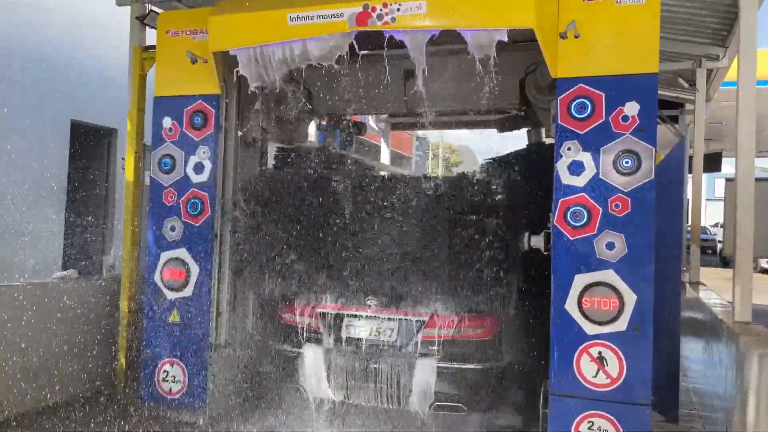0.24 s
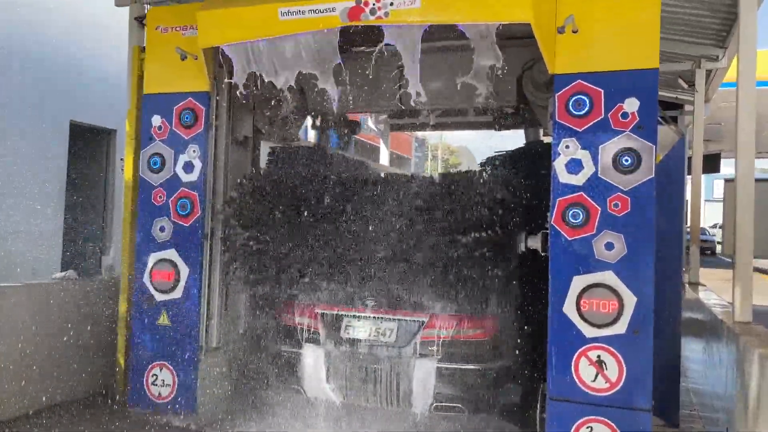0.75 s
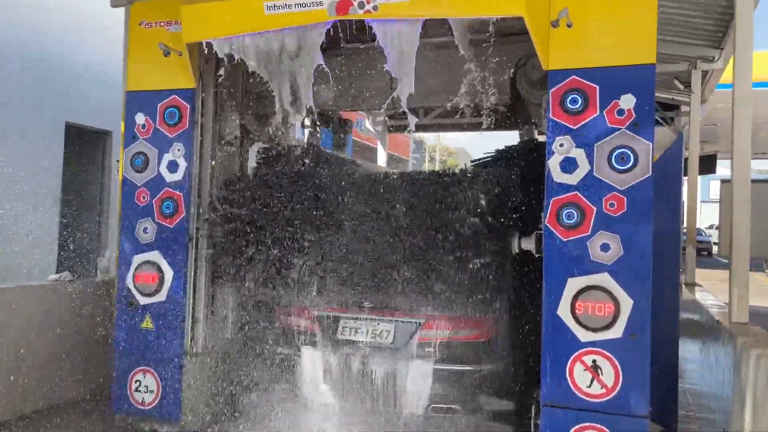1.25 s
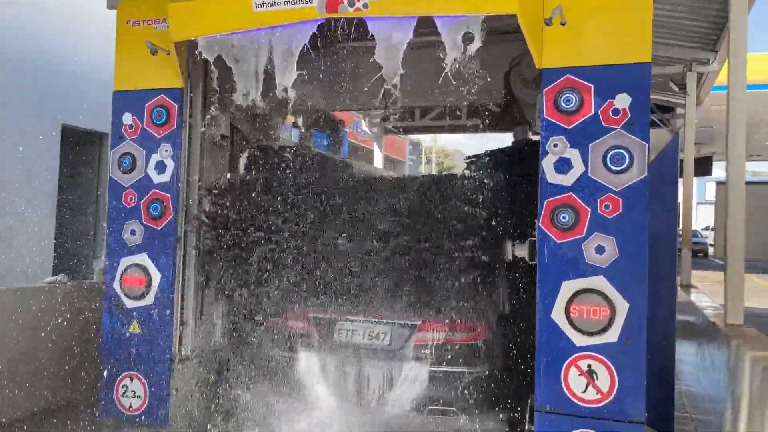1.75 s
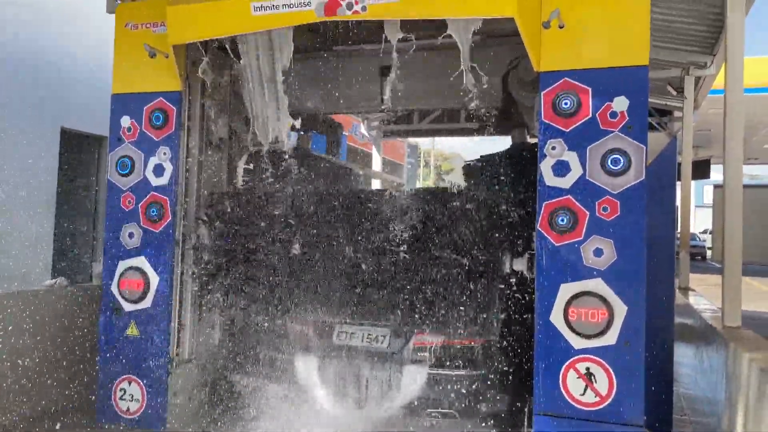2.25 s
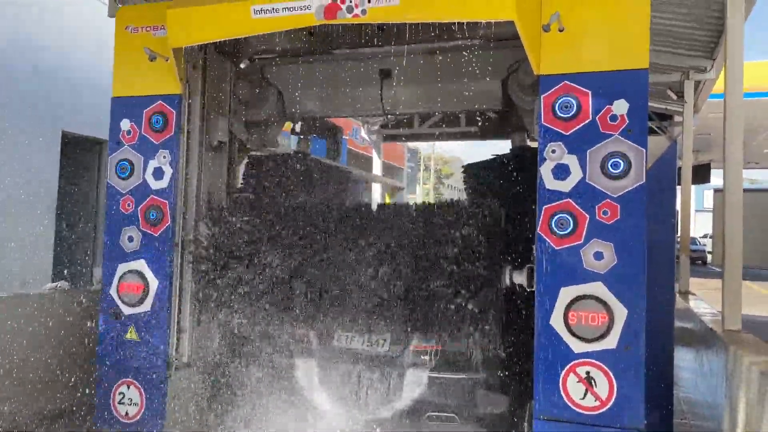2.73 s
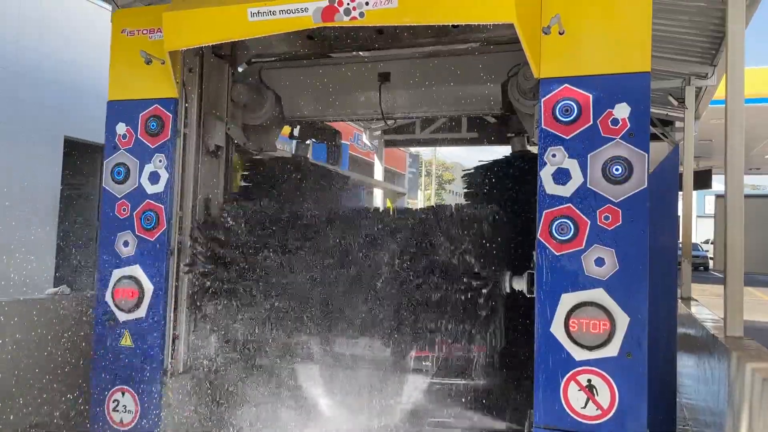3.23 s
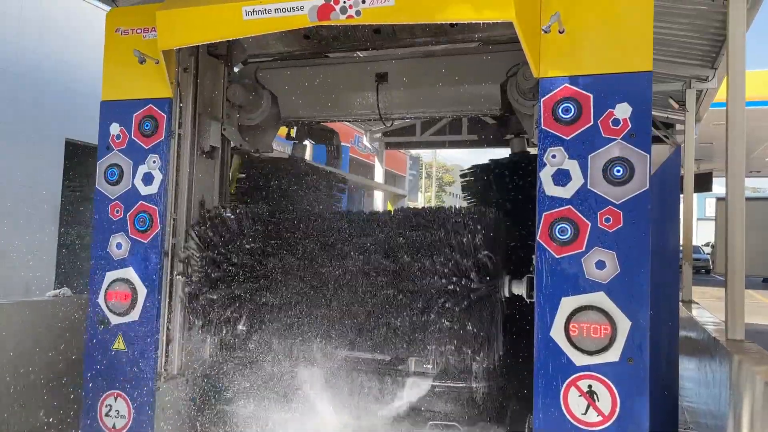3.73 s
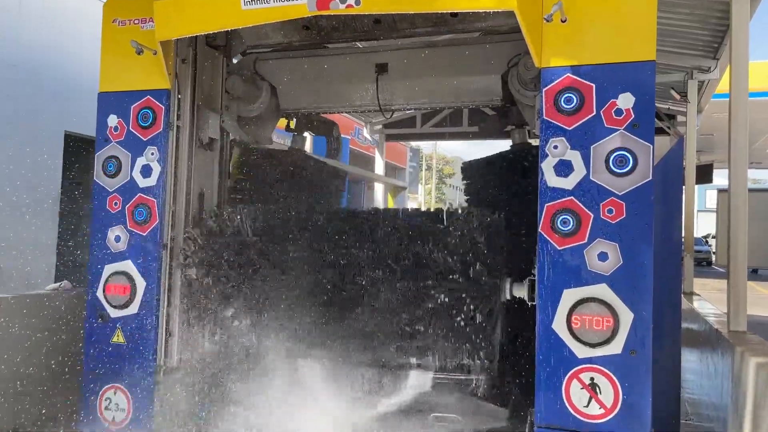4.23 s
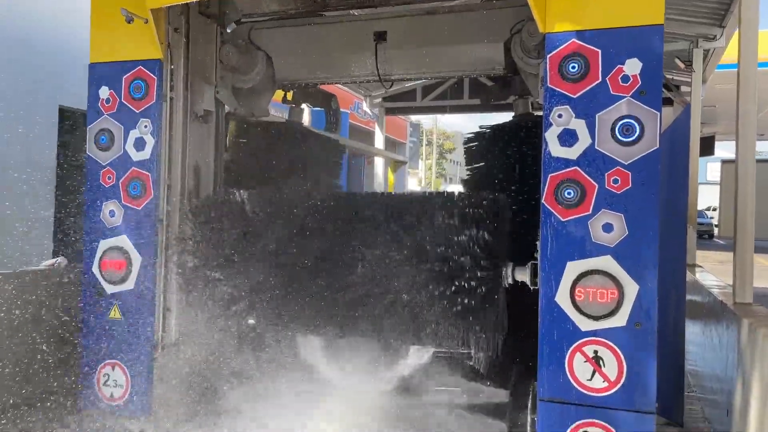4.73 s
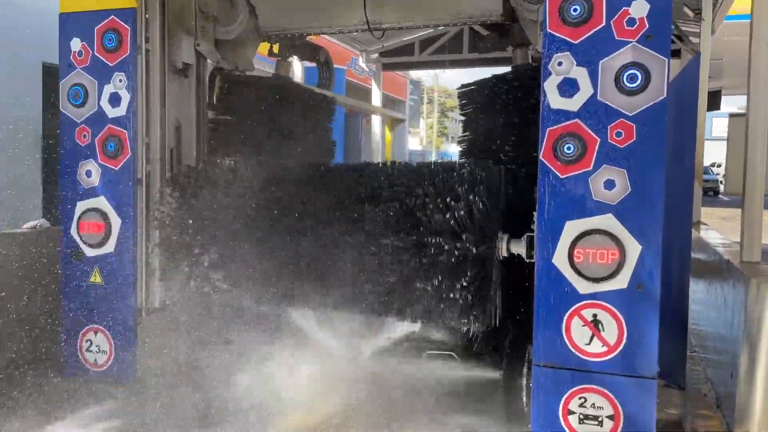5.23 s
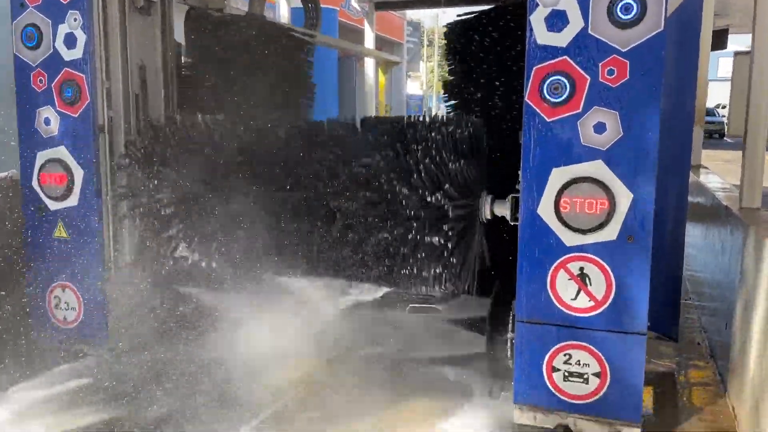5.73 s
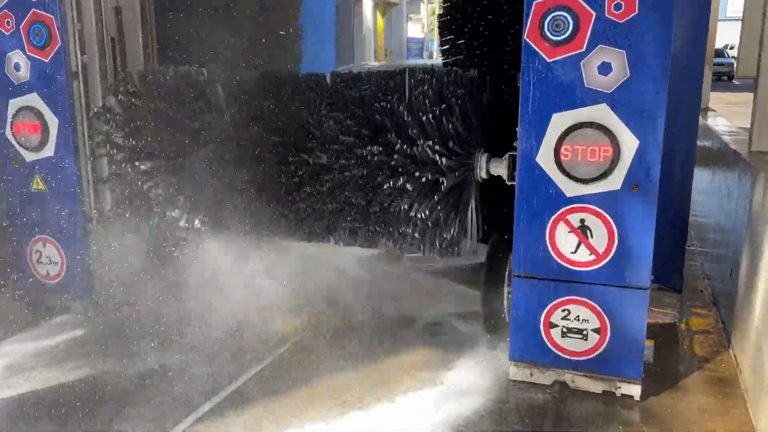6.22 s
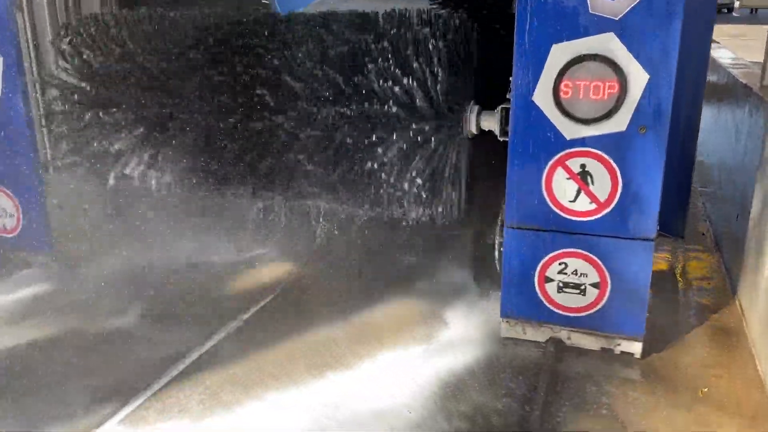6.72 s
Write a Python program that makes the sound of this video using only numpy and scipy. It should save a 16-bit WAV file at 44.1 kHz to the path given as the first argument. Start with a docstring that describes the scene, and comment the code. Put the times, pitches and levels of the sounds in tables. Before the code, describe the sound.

Close outdoor stereo phone sound a few metres behind an automatic car wash. From 0 s, a dense bright hiss of spray, speckled with tiny drops and faint short tones, lies over wet bristles swishing on paint and a low, fluttering drumming of car panels. Pump and brush motors hum low with wavering overtones and a faint whine. Soft splashes mark the first half second; dull low panel thrums come irregularly, stronger around 1-1.4 s and at 2.5 s. From about 4.4 s jets increasingly patter on the wet floor, with a splash at 4.5 s, and a hiss surge with a bright tick and splash near 5.1 s. Scrubbing weakens from 5.9 s. Raspy hollow bursts come at 6.1 and 6.4 s; the main spray shuts off around 6.5 s amid short whistles, one sliding downward at 6.7 s with another rasp. Thinner hiss, quieter brush and small splashes remain until 7 s.

```python
"""The brush of a gantry car wash scrubs a car, heard a few metres behind it on a phone with two microphone ports.
Wet bristles drum on ringing body panels and swish over the paint; noise and tiny drops make the nozzles hiss,
short faint decaying tones fleck the hiss, and pump and brush drive hum in wavering overtones.
The brush works down the back of the car and slips off it; jets splash and beat on the floor, and the main spray
shuts off amid rasps and a narrow noise that whistles, then slides down, as a jet sweeps over a hollow part."""
import sys
import numpy as np
from scipy import signal
from scipy.fft import rfft, irfft, next_fast_len
from scipy.io import wavfile
from scipy.ndimage import map_coordinates

SR = 44100
rng = np.random.default_rng(int(sys.argv[2]) if len(sys.argv) > 2 else 0)


def waveform_to_disk(signal):
    """Save audio, clipped to [-1, 1], as 16-bit WAV at the path in sys.argv[1]."""
    frames = np.transpose(np.atleast_2d(signal))
    scaled = np.clip(frames, -1, 1) * 32767
    samples = np.round(scaled).astype(np.int16)
    wavfile.write(sys.argv[1], SR, samples)


N = 307377
T = np.arange(N) / SR
SIZE = next_fast_len(N, real=True)
HZ = np.maximum(np.fft.rfftfreq(SIZE, 1 / SR), 1)
HUM_WAVER_DB = 2  # typical waver of every machine tone


def undb(db):
    """Decibels to gain."""
    return np.exp(np.asarray(db) * np.log(10) / 20)


def unit(x):
    """Scale to rms 1."""
    return x / np.sqrt(np.mean(x ** 2))


def curves(table):
    """The columns of a time table, one value a sample."""
    s, *columns = np.transpose(table)
    return [np.interp(T, s, c) for c in columns]


def spectra(table):
    """The columns of a frequency table, one value a bin, joined along log frequency."""
    hz, *columns = np.transpose(table)
    return [np.interp(np.log(HZ), np.log(hz), c) for c in columns]


def through(x, response):
    """Filter by a frequency response; the result has rms 1."""
    return unit(irfft(rfft(x, SIZE) * response, SIZE)[..., :N])


def resonance(hz, width):
    """Response of one damped mode, gain 1 at its centre."""
    return 1 / (1 + 1j * (HZ ** 2 - hz ** 2) / (HZ * width))


def ramp(start, takes):
    """Goes from 0 to 1 in a straight line; start and duration in seconds."""
    return np.clip((T - start) / takes, 0, 1)


def swell(s, half):
    """A bell-shaped rise to 1 and back."""
    return np.exp(-.5 * ((T - s) / half) ** 2)


def walk(rate):
    """Smooth chance with a spread of about 1 that changes about rate times a second."""
    knots = np.arange(0, T[-1] + 1 / rate, 1 / rate)
    # 1.2 makes up for the spread lost between the knots
    return 1.2 * np.interp(T, knots, rng.standard_normal(1024)[:len(knots)])


def impacts(per_second, scatter_db):
    """Two unrelated showers of tiny blows of uneven size, together at rms 1."""
    struck = rng.random((2, N)) < per_second / SR
    size = undb(scatter_db * np.clip(rng.standard_normal((2, N)), -2, 2))
    return unit(struck * size * rng.choice([-1, 1], (2, N)))


def patchy(pair, depth_db, rate, count=24):
    """Narrow bands swell and sink each on their own, so the colour keeps shifting."""
    hz, s, frames = signal.stft(pair, SR, nperseg=512)
    band = np.interp(np.log1p(hz), np.log([300, 16000]), [0, count - 1])
    chance = rng.standard_normal((count, 512))
    drift = map_coordinates(chance, np.meshgrid(band, s * rate, indexing="ij"), order=1)
    return signal.istft(frames * undb(depth_db * drift), SR)[1][:, :N]


def rings(table, width, bend=np.ones(N)):
    """Random shaking keeps a resonance sounding briefly; width is a share of its pitch, bend multiplies it."""
    out = np.zeros((2, N))
    blows = rng.standard_normal((2, 2, N))
    for s, half, hz, db in table:
        near = np.flatnonzero(abs(T - s) < 4 * half)
        narrow = signal.butter(2, width * hz / 2, fs=SR, output="sos")
        shake = signal.sosfilt(narrow, blows[..., near - rng.integers(N)])  # a random stretch of the noise
        phase = 2 * np.pi * np.cumsum(hz * bend[near]) / SR
        bell = swell(s, half)[near]
        ring = (shake[0] * np.cos(phase) + shake[1] * np.sin(phase)) * bell
        ring = ring / np.linalg.norm(ring, axis=1, keepdims=True)
        out[:, near] += ring * np.linalg.norm(bell) * undb(db)
    return out


def brush(pressure_db):
    """Tufts of bristles slap and scrub the car; the panels ring and the whole shell booms."""
    # body panel modes: (frequency [Hz], width [Hz], level [dB])
    panel_modes = [(106.2, 18.7, 1), (126.7, 29, 1.5), (146, 35.5, 0), (196, 26.7, -0.5),
                   (222.8, 18.5, -0.5), (237.3, 17, -1), (260.6, 28.5, -4), (299.6, 26, -3.5),
                   (320, 20, -3.5), (351, 55, -12)]
    # spectrum of the shell's deep boom: (frequency [Hz], relative level per Hz [dB])
    boom_spectrum = [(20, -48), (30, -26), (40, -16), (55, -3), (80, -3), (105, -2.5), (150, -5),
                     (400, -50)]
    # level of that boom: (time [s], level [dB])
    boom_level = [(0, -39), (.6, -34), (1.35, -36.5), (1.65, -32.5), (2.7, -35), (3.55, -32.5),
                  (4.1, -38.5), (4.75, -36), (5.2, -37), (6.2, -34), (6.97, -45)]
    drum_db, scrub_db = -28.5, -34.5  # at a pressure of 0 dB, bristles on the paint
    scrub_follows = 0.17  # dB per dB of pressure

    slaps = impacts(per_second=1200, scatter_db=2)
    panels = 0
    for k, (hz, width, db) in enumerate(panel_modes):
        panels = panels + (-1) ** k * undb(db) * resonance(hz, width)
    soft_contact = 1 / (1 + (HZ / 600) ** 4)  # limp wet strands cannot push quickly
    less_bass = HZ ** 2 / (HZ ** 2 + 80 ** 2)
    drum = through(slaps, panels * soft_contact * less_bass)
    scrub = through(impacts(per_second=2500, scatter_db=2), resonance(406, 230) ** 2)
    boom = through(impacts(per_second=1500, scatter_db=0.5), undb(spectra(boom_spectrum)[0]))

    slip_db = -6 * ramp(5.9, 0.38)  # the bristles slip off the paint and scrub less
    drum = drum * undb(drum_db + pressure_db)
    scrub = scrub * undb(scrub_db + scrub_follows * pressure_db + slip_db)
    return drum + scrub + boom * undb(curves(boom_level)[0])


def swish(pressure_db, shut):
    """Thousands of wet strand tips flick over the paint, softer once the water is cut."""
    # spectrum of the flicks: (frequency [Hz], relative level per Hz [dB])
    swish_spectrum = [(100, -40), (300, -2.5), (500, -1.5), (660, 0.5), (1100, -1), (1550, -3),
                      (2000, -3.5), (2600, -8.5), (4000, -13.5), (8000, -24), (15000, -30)]
    open_db, shut_db = -29, -2.5  # level at a pressure of 0 dB; its change with less water on the strands
    follows = 0.27  # dB per dB of pressure
    flicks = patchy(impacts(per_second=9000, scatter_db=2), depth_db=2, rate=12)
    level_db = open_db + follows * pressure_db + shut_db * shut
    return through(flicks, undb(spectra(swish_spectrum)[0])) * undb(level_db)


def spray(shut):
    """Nozzles hiss as their jets break up, and the drops patter on car and floor."""
    # spectrum of the spray: (frequency [Hz], relative level per Hz [dB])
    spray_spectrum = [(300, -8), (1000, 0.5), (2000, 0.5), (3000, 2), (4000, 2), (5100, .3), (6200, -1.6),
                      (8000, -2.8), (9200, -5.3), (10600, -8.5), (12400, -8.6), (15500, -7.5)]
    # a jet sweeps towards the microphones: (time [s], rise of the spray [dB])
    surges = [(5.12, 2.5), (5.65, 1.5), (6.36, 1)]
    open_db, shut_db = -30, -7.5  # level with the nozzles fully open; its change once the valve is shut
    mist = rng.standard_normal((2, N))
    drops = impacts(per_second=5500, scatter_db=0)
    water = patchy(mist + undb(-6.5) * drops, depth_db=0.97, rate=40)
    surge_db = sum(db * swell(s, half=0.16) for s, db in surges)
    return through(water, undb(spectra(spray_spectrum)[0])) * undb(open_db + surge_db + shut_db * shut)


def flecks(shut, count=6000):
    """Short faint decaying tones at random pitches, 0.9 to 5.5 kHz, fleck the hiss."""
    low, high, t60 = 900, 5500, .05  # range of pitch [Hz], time to fall by 60 dB [s]
    open_db, shut_db = -37, -5  # level of all tones together; its change once the valve is shut
    out = np.zeros((2, N + SR // 10))
    age = np.arange(SR // 10) / SR
    for when, pitch, size, place in rng.random((count, 4)):
        hz = low * (high / low) ** pitch
        ring = np.sin(2 * np.pi * hz * age) * np.exp(-np.log(1000) * age / t60)
        start, angle = int(when * N), 2 * np.pi * place
        out[:, start:start + len(age)] += np.outer([np.cos(angle), np.sin(angle)], ring) * size ** 2
    return unit(out[:, :N]) * undb(open_db + shut_db * shut)


def tone(hz, db, waver):
    """One machine tone that wavers in pitch (by a share) and in strength."""
    turns = hz * np.cumsum(1 + waver * walk(rate=8)) / SR
    return np.sqrt(2) * np.sin(2 * np.pi * turns) * undb(db + HUM_WAVER_DB * walk(rate=5))


def motors():
    """Pump and brush drive hum at nearly steady speeds; their overtones waver a little in strength."""
    # overtones of the pump: (multiple of its speed, rms level [dB], change as the load eases [dB])
    pump_overtones = [(2, -50, 0), (3, -44.5, 1), (4, -47, -3), (12, -56, 0), (15, -57, 0)]
    # overtones of the brush drive: (multiple of its speed, rms level [dB], change as the load eases [dB])
    drive_overtones = [(1, -40, -1.5), (2, -38.7, -5), (3, -43.8, 3.7)]
    # the pump's singing overtone: (time [s], rms level [dB])
    sing_level = [(0, -41.5), (1.2, -45.5), (2.2, -44), (3.3, -42.5), (4.6, -40), (5.5, -47), (6.4, -52),
                  (6.97, -55)]
    pump_hz, drive_hz, speed_waver = 73.43, 87, .0013  # waver as a share of the speed
    eased = np.interp(T, [3.2, 6.3], [0, 1])  # the load on the drives eases
    free_db = -5 * ramp(6.3, 0.54)  # the brush spins free and its drive quietens

    hum = 0
    for hz, overtones, fade_db in ((pump_hz, pump_overtones, 0), (drive_hz, drive_overtones, free_db)):
        turns = hz * (T + np.cumsum(speed_waver * walk(rate=2.95)) / SR)
        for multiple, db, change_db in overtones:
            level = undb(db + change_db * eased + fade_db + HUM_WAVER_DB * walk(rate=3.03))
            phase = 2 * np.pi * (multiple * turns + rng.random())
            hum = hum + np.sqrt(2) * np.sin(phase) * level
    singing = tone(6 * pump_hz, curves(sing_level)[0], waver=.003)
    gear_whine = tone(632, db=-48, waver=.0052)  # faint and unsteady
    return hum + singing + gear_whine


def splashes_and_tick():
    """Splashes, and one bright tick of a drop near the microphones: ringing noise, unrelated left and right."""
    # (time [s], half length [s], ring frequency [Hz], level at the peak [dB])
    bursts = [(.3, .3, 722, -36.5), (.2, .2, 1400, -39), (4.53, .05, 1795, -36), (4.53, .04, 2730, -37),
              (5.04, .018, 10000, -39), (5.1, .13, 2300, -37), (6.34, .05, 2610, -35),
              (6.83, .015, 2850, -42), (6.83, .045, 717, -37), (6.9, .09, 2900, -41.5)]
    return rings(bursts, width=.26)


def thrums():
    """The brush bears down on one panel, which rings low for a moment."""
    # (time [s], half length [s], ring frequency [Hz], level at the peak [dB])
    panel_thrums = [(.47, .025, 150, -31), (.8, .012, 240, -28), (.92, .06, 125, -29),
                    (.99, .03, 190, -25.5), (1.19, .025, 125, -24.5), (1.23, .05, 230, -25.5),
                    (1.39, .025, 170, -28), (1.8, .015, 190, -32), (2.33, .012, 110, -27),
                    (2.5, .035, 195, -24), (2.97, .03, 150, -32), (3.2, .1, 130, -31),
                    (3.37, .022, 90, -26), (3.62, .025, 210, -31), (4.05, .015, 135, -28),
                    (5.15, .03, 170, -32), (5.83, .035, 265, -28), (6.05, .08, 160, -33)]
    return rings(panel_thrums, width=.26)


def floor_wash(shut):
    """Past the car the jets beat on the wet floor, a broad patter that grows, holds and stops with the valve."""
    # spectrum of the patter: (frequency [Hz], relative level per Hz [dB])
    wash_spectrum = [(250, -20), (360, -2), (520, -14), (720, 1.5), (1200, -1), (2200, -6.5), (3500, -17),
                     (8000, -36)]
    patter = through(impacts(per_second=6000, scatter_db=3), undb(spectra(wash_spectrum)[0]))
    return patter * ramp(4.4, 1.6) * (1 - shut) * undb(-32.5)


def hollow():
    """A jet sweeps over a hollow part and rasps in its modes."""
    # modes of the part: (frequency [Hz], width before squaring [Hz], level [dB])
    hollow_modes = [(1130, 300, -3), (1500, 330, 0), (1950, 380, -4)]
    # passes of the jet: (time [s], half length [s], level at the peak [dB])
    sweeps = [(6.09, .07, -34), (6.42, .045, -34), (6.55, .05, -41.5), (6.695, .045, -33.5)]
    modes = sum(undb(db) * resonance(hz, width) ** 2 for hz, width, db in hollow_modes)
    rasp = through(impacts(per_second=1700, scatter_db=4), modes)
    return rasp * sum(undb(db) * swell(s, half) for s, half, db in sweeps)


def whistle_and_slide():
    """Narrow noise whistles near 2 kHz, then slides down to a lower note, as a jet sweeps over a hollow part."""
    # short whistles: (time [s], half length [s], frequency [Hz], level at the peak [dB])
    whistles = [(6.42, .035, 2010, -38), (6.49, .025, 2010, -40.5), (6.652, .016, 2010, -37.5)]
    # the one slide: (time [s], half length [s], final frequency [Hz], level at the peak [dB])
    slide = (6.695, .034, 1430, -32)
    above, fall_s, settle_s = .4, 6.635, .036  # starts higher by this share, falls from here, time constant [s]
    bend = 1 + above * np.exp(-np.maximum(T - fall_s, 0) / settle_s)
    return rings(whistles, width=.035) + rings([slide], width=.055, bend=bend)


def ports(pair):
    """Two unrelated sounds become left and right: alike in the bass, diffuse in the middle, lagged in the treble."""
    # the two microphone ports:
    # (frequency [Hz], likeness [0-1], phase by which left leads [rad], left minus right [dB])
    port_table = [(60, .98, 0, -1.1), (130, .96, 0, -1), (290, .83, 0, -.7), (680, .56, .2, 1.1),
                  (1500, .42, -.2, -.7), (2100, .52, -.1, -1), (2900, .55, .7, 1), (4300, .46, .1, 2.5),
                  (5100, .25, .2, 5.7), (5800, .58, -.2, 5.7), (6900, .7, -1.3, 2), (8100, .97, -3.1, 0),
                  (9600, .72, -4.6, 0), (10900, .94, -6.1, 0), (12100, .94, -6.5, 0), (13200, .68, -7.7, 0),
                  (14600, .99, -9.4, 0)]
    likeness, lead, balance_db = spectra(port_table)
    likeness = np.clip(likeness, 0, 1)
    mid, side = rfft(pair, SIZE) * np.sqrt([1 + likeness, 1 - likeness]) / np.sqrt(2)
    sign = np.array([[1], [-1]])  # left, right
    lag_and_balance = np.exp(.5j * sign * lead) * undb(sign * balance_db / 2)
    return irfft((mid + sign * side) * lag_and_balance, SIZE)[:, :N]


def scene():
    """Brush and water reach the two ports; splashes are added wide, and the motors alike in both channels."""
    # how hard the brush presses on the car: (time [s], pressure [dB])
    pressure = [(0, -3), (.7, -1.6), (1.2, .5), (1.6, -1.3), (2.2, -2.3), (2.6, -1.8), (3.3, -1.5),
                (4.3, -3.4), (5.9, -2.2), (6.4, -3), (6.7, -6.5), (6.97, -6)]
    pressure_db, = curves(pressure)
    shut = ramp(6.43, 0.12)  # the main valve closes
    body = brush(pressure_db) + thrums()
    water = swish(pressure_db, shut) + spray(shut) + flecks(shut) + floor_wash(shut)
    at_ports = ports(body + water + hollow() + whistle_and_slide())
    return at_ports + splashes_and_tick() + motors()


def record(dry):
    """A steep low-pass at 15 kHz ends the treble."""
    return signal.sosfilt(signal.ellip(10, .1, 80, 15000, fs=SR, output="sos"), dry)


dry = scene()
out = record(dry)
waveform_to_disk(out)
```